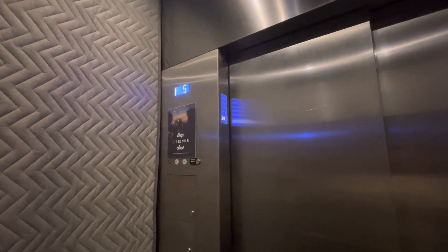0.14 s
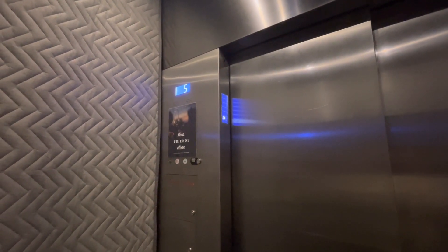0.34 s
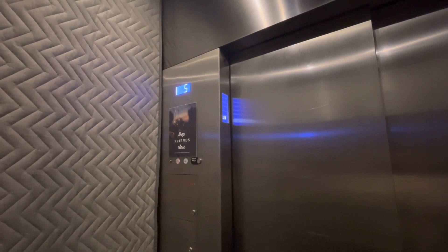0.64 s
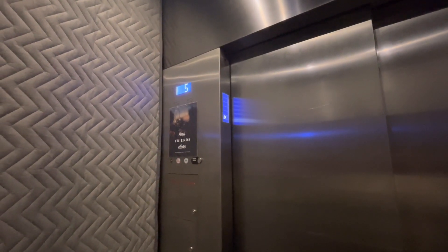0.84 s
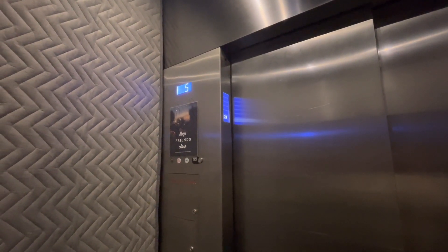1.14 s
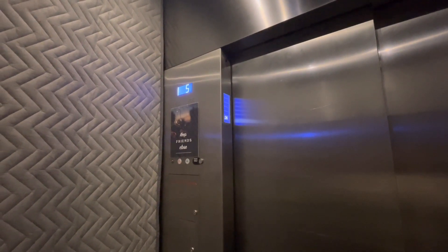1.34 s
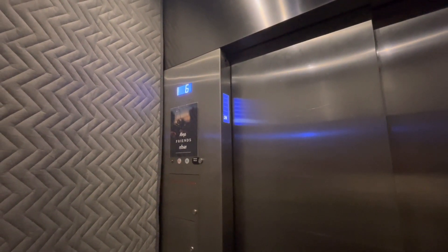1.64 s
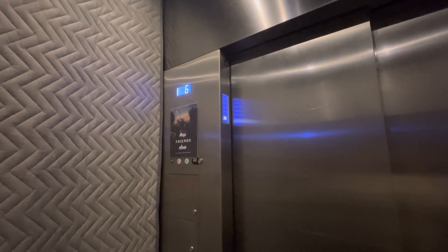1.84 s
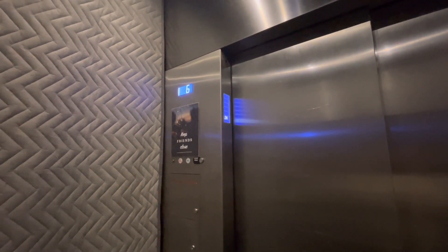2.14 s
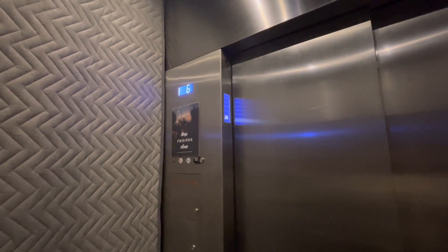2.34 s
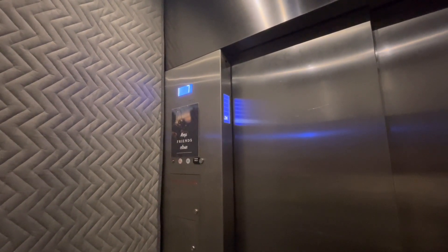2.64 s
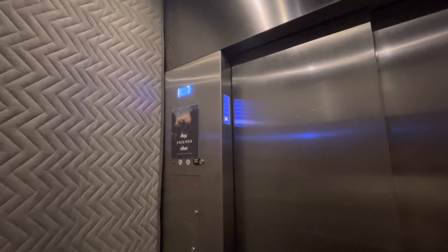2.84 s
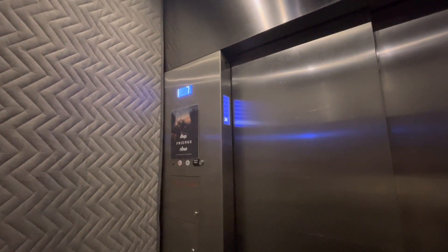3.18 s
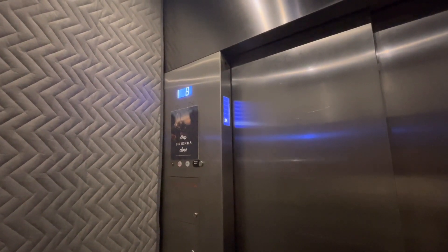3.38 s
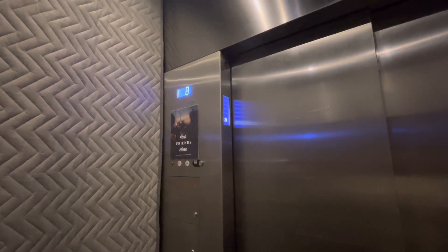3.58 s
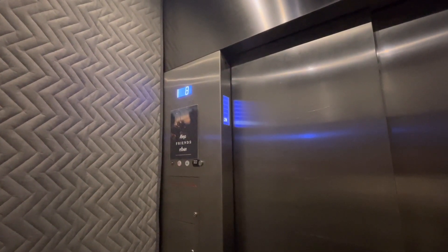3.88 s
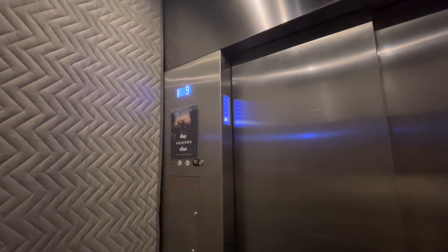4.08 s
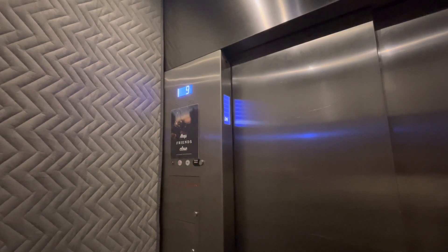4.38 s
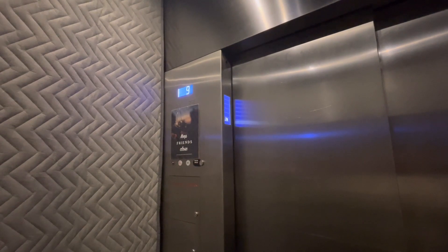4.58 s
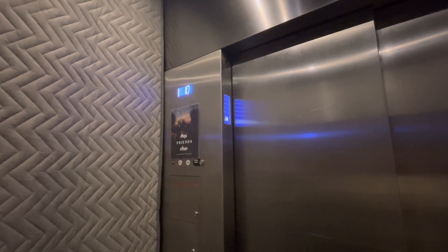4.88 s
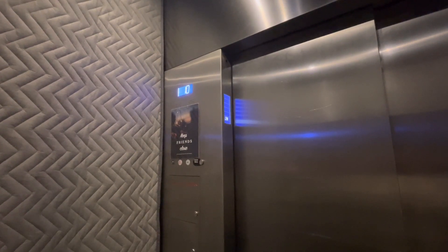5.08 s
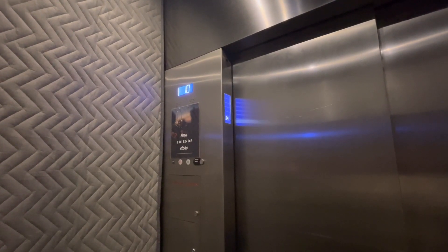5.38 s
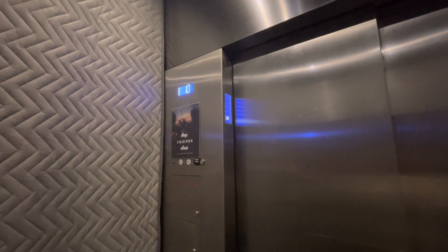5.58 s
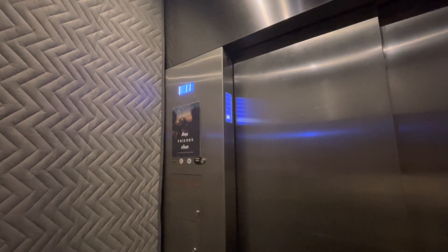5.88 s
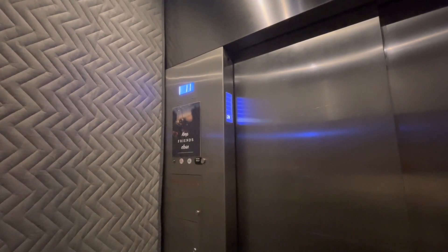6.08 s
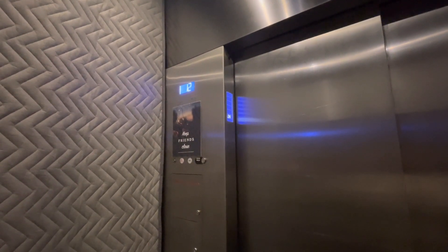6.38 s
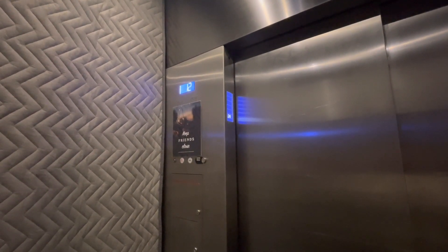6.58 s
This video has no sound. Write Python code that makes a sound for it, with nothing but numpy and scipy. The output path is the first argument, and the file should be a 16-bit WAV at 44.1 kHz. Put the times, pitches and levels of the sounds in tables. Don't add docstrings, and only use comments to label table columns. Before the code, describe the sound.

Inside a closed steel elevator car, a low hum starts soft and deep at 0 s, with faint door taps and a quiet machinery drone. It rises in pitch and strength as the car speeds up; small metal ticks cluster from 0.6 s, with a crisp snap at 1.0 s. Dull rail-joint thumps fall near 0.5 (faint), 1.6, 2.4, 3.2 (strongest), 4.0, 4.7 (softer), 5.6 and 6.3 s. By about 3.2 s the hum levels off, wavering and swelling near 4.5 s over broad rumble and shaft roar. Air hisses in gusts at the door gap, strongest around 3.7 s, while a ceiling fan whirs. Light panel rattles run from 1.6 to 3.1 s, return at 5.1 s and again from 5.9 s. A faint scrape and creaks come near 5.5 s, a small tick at 6.3 s. The ride continues unbroken to 6.7 s, with slight microphone hiss.

```python
import sys
import numpy as np
from scipy import signal
from scipy.io import wavfile
from scipy.ndimage import uniform_filter1d

SR = 44100
rng = np.random.default_rng(int(sys.argv[2]) if len(sys.argv) > 2 else 0)


def inscribe(sig):
    pcm = np.round(np.clip(np.atleast_2d(sig).T, -1, 1) * 32767)
    wavfile.write(sys.argv[1], SR, pcm.astype(np.int16))


def rack_gain(trim_db):
    fader = np.asarray(trim_db, float)
    return 10 ** (fader / 20)


N = 296352
TIME = np.arange(N) / SR

# time in seconds, turning tone in Hz, level in dB.
ROLLER_RIDE = [(0, 66.4, -55.5), (.55, 78.1, -51), (.85, 82.78, -53), (1.27, 96.1, -40.5),
               (1.45, 98.3, -51), (1.7, 100.6, -46), (2.1, 102, -43), (2.28, 124, -53.5),
               (2.45, 128.1, -41), (2.9, 130, -47), (3.08, 146, -41), (3.25, 152, -43.5),
               (3.85, 153, -44.5), (4.55, 152.3, -37.5), (5.1, 152.8, -46), (5.85, 150.3, -54),
               (6.2, 150, -47), (6.72, 148.5, -43)]
CRUISE_HZ = 152
# frequency in Hz, width in Hz, level in dB.
CABIN_MODES = [(50.4, 14, -65), (75.66, 8.4, -54), (96.3, 11, -52.5), (129.76, 13, -52),
               (150.86, 13.2, -56.5)]
# frequency in Hz, width in Hz, level in dB.
WALL_MODES = [(212.8, 13, -57.5), (240.8, 11, -57.5), (282.6, 5.6, -63), (309.6, 16, -57.5),
              (351.2, 16, -62.5)]
# time in seconds, peak in dB, frame swing in Hz.
RAIL_JOINTS = [
    (0.468, -48, 72),
    (1.57, -31.5, 66.82),
    (2.39, -32.5, 62.4),
    (3.171, -30.5, 66),
    (4.028, -32.5, 67.2),
    (4.699, -39, 63.4),
    (5.56, -35, 58),
    (6.29, -34, 56),
]
# frequency in Hz, density in dB per Hz.
RUMBLE_SPECTRUM = [(12, -45), (20, -16.5), (64, 1.5), (103, -0.5), (139, -1.5), (160, -6.5), (178, -8),
                   (190, -16), (250, -40), (420, -120)]
# frequency in Hz, density in dB per Hz.
ROAR_SPECTRUM = [(100, -22.5), (170, -4), (184, -12), (231, -5.5), (308, -8.5), (444, -13.5), (738, -21.5),
                 (905, -35), (1100, -41.5), (1430, -60.5), (2420, -120)]
# frequency in Hz, density in dB per Hz.
FAN_SPECTRUM = [(530, -33.5), (900, 0.5), (1020, -0.5), (1380, 0.5), (1530, -14), (1740, -8.5), (2600, -23),
                (3380, -46), (5720, -120)]
# frequency in Hz, density in dB per Hz.
DOOR_AIR_SPECTRUM = [(1290, -31), (2200, -1.5), (3000, -1.5), (3380, -0.5), (4720, -2), (5850, -7),
                     (6350, -11), (7920, -9.5), (9260, -12), (12100, -12.5), (12900, -21), (16800, -57.5),
                     (22000, -120)]
# centre in seconds, lift in dB, half length in seconds.
DOOR_GUSTS = [
    (1.456, 6, 0.042),
    (2.462, 2.5, 0.12),
    (3.101, 4.5, 0.37),
    (3.67, 8.5, 0.23),
    (3.888, 5.5, .05),
    (4.065, 7, 0.11),
    (4.701, 2, .2),
    (5.17, 3, 0.082),
    (5.58, 6, 0.1),
    (6.36, 4.5, 0.083),
]
# centre in seconds, lift in dB, half length in seconds.
FAN_GUSTS = [(3.1, 4.5, 0.15), (3.2, 1, .1), (4.42, 3, .05), (5.35, 6, 0.071), (3.6, 2.5, .1)]
# frequency in Hz, width in Hz, level in dB over the whir.
HOUSING_MODES = [(1367, 190, 3), (1370, 74, -5), (1231, 62, -5.5), (2240, 47, -20), (6400, 450, -22)]
# frequency in Hz, wander in Hz, level in dB.
BLADE_TONES = [(1360, 9, -86.5), (1208, 9, -92), (241, 1.2, -62)]
# time in seconds, peak in dB, left-right lean in dB, track note in dB.
DOOR_KNOCKS = [(0.121, -67, -1, -78), (0.792, -65, 0, -69), (1.61, -70, 3, -76), (1.7391, -73, -1, -76),
               (1.8791, -75, 2, -78), (2.0106, -68.5, -1, -73), (2.146, -72, 1.5, -74),
               (2.2767, -90, 5, -85), (2.44, -79, -2.5, -79.5), (2.7248, -68.5, -1, -70),
               (2.857, -69, 1.5, -75), (3.0791, -73.5, -2, -76), (5.0484, -72, -1, -77),
               (5.1752, -63, 0, -67), (5.2927, -77, -5, -78), (5.88, -64.5, -1, -71), (5.999, -75, 0, -75),
               (6.285, -73, -1, -76), (6.4036, -69, 1, -75), (6.504, -72.5, 2, -71.5)]
PANEL_HZ = [2780, 3450, 4775, 6360, 7400]
# level in dB, 60 dB decay in seconds.
PANEL_RINGING = [(-11, 0.06), (-12.5, 0.026), (-7, .03), (-16, 0.026), (-14.5, .04)]
# time in seconds, peak in dB, centre in Hz, 60 dB decay in seconds, left-right lean in dB.
TRIM_RINGS = [(1.0, -57, 1351, 0.14, -5), (1.028, -61, 1373, .1, -4), (.793, -60, 1330, 0.12, -1),
              (.87, -68, 1390, 0.078, -4), (1.422, -76.5, 6630, .15, 2), (3.875, -67, 6040, .06, -1),
              (4.008, -72.5, 7210, 0.11, -2), (4.397, -86, 6293, .11, 0), (4.922, -65, 6490, 0.17, 5),
              (4.926, -65, 5000, 0.14, -2), (5.539, -73, 2700, 0.49, 3), (5.56, -75, 3570, .4, 1)]
# time in seconds, peak in dB, centre in Hz, 60 dB decay in seconds, left-right lean in dB.
TRIM_CREAKS = [(.708, -69, 2000, .05, -2), (1.000, -63, 1000, 0.055, -8), (1.027, -68, 2200, 0.062, -4),
               (1.026, -64, 6400, 0.026, 5), (1.122, -78, 2960, .04, -8), (2.375, -81, 9740, .15, 2),
               (2.49, -79.5, 9484, 0.21, -5.5), (5.041, -80, 10500, 0.045, 4), (5.135, -87, 10010, .089, 5),
               (5.605, -78, 9930, .17, -5), (5.84, -80.5, 9460, .3, -1), (6.343, -55.5, 7800, 0.014, 7),
               (.794, -69, 1700, 0.14, -3), (0.14, -70, 1700, 0.11, 2), (1.5, -72, 2000, .1, -3),
               (5.607, -76, 9200, .04, 0), (2.4, -80, 9300, .15, 2), (2.478, -82, 9500, .1, -4),
               (2.51, -82, 10200, .1, -4), (5.16, -83, 9800, .2, 3), (5.2, -83, 9800, .15, 3),
               (5.825, -83, 10300, .2, 0), (2.865, -78, 6500, .25, 0), (2.5, -78, 4300, .2, 0),
               (1.739, -78, 7400, .03, 0), (1.612, -75, 7400, .03, 0)]
# time in seconds, peak in dB, centre in Hz, 60 dB decay in seconds, left-right lean in dB.
TRIM_RUSTLES = [(.642, -76, 4500, .03, 6), (.869, -66, 5000, .023, 1), (1.316, -67.5, 6000, .026, 4),
                (1.41, -81, 7000, .15, 2), (1.491, -75, 3002, .046, 3), (3.877, -67, 4495, .13, -2),
                (3.876, -71, 11000, .07, 0), (4.015, -73.5, 3200, .45, -5.5), (4.396, -67.5, 4880, .21, -1),
                (5.54, -85, 5000, .5, 2)]
# time in seconds, peak in dB, centre in Hz, width in octaves.
TRIM_SNAPS = [(.642, -66, 4500, 1.1), (0.793, -64, 5000, 1.54), (.869, -70, 6000, .7),
              (0.8689, -66, 1890, 0.61), (.9990, -45, 1000, 1.6), (.9992, -62, 2300, .9),
              (1.0263, -60, 2200, .8), (1.0265, -60, 1400, .5), (1.0273, -72, 6270, 0.46),
              (1.316, -70, 5970, 1.8), (2.726, -68, 3500, 1.73), (3.876, -66, 6334, 1.19),
              (4.397, -68, 6260, 1.2), (4.926, -56, 5800, 0.78), (6.343, -63, 8240, 0.5),
              (6.293, -70, 8636, 0.56)]
# start in seconds, length in seconds, level in dB, start in Hz, end in Hz, left-right lean in dB.
TRIM_SCRAPES = [
    (5.536, .065, -76, 2760, 2620, 0),
    (5.61, .07, -84, 2700, 2750, 0),
    (5.55, .045, -85, 6450, 6150, 1),
    (5.47, 0.032, -78.5, 1950, 1900, 0),
    (3.17, .09, -83, 2700, 2650, -1),
]
# frequency in Hz, density in dB per Hz.
DRONE_SPECTRUM = [(65, -32.5), (110, -5), (140, 0), (167, -5), (178, -17), (227, -21.5), (306, -25.5),
                  (392, -33), (600, -40.5), (780, -77), (1320, -120)]
# frequency in Hz, wander in Hz.
LAMP_LINES = [(11880, 8), (12000, .3), (12145, 12)]
LAMP_DB = [-110, -108, -114]
# frequency in Hz, density in dB per Hz.
HISS_SPECTRUM = [(1470, -28.5), (2500, -1), (3730, -10), (6440, -2), (9230, -9), (12300, -13.5),
                 (16000, -45), (22000, -120)]
# frequency in Hz, left-right likeness from -1 to 1.
LIKENESS = [(30, 1), (45, 1), (75, 0.89), (100, 0.98), (200, 0.58), (300, 0.9), (480, .3), (1270, .2),
            (2700, -0.12), (5000, .05), (9000, -.15), (12500, 0.4)]
# frequency in Hz, left minus right in dB.
LEANING = [(60, -1.5), (130, -2), (280, 0.5), (590, 2), (1270, 1), (2710, -4), (5820, 4), (12500, -2.5)]
# frequency in Hz, width in Hz, lift in dB.
PORT_PEAK = (6450, 700, 3.7)
BASS_LAG = 7


def rms_one(x):
    return x / np.sqrt(np.mean(x ** 2) + 1e-20)


def in_time(rows):
    s, *columns = np.transpose(rows)
    return [np.interp(TIME, s, c) for c in columns]


def at_hz(points, hz, outside=None):
    f, v = np.transpose(points)
    return np.interp(np.log(hz), np.log(f), v, left=outside, right=outside)


def bell(centre_s, half_s):
    return np.exp(-((TIME - centre_s) / half_s) ** 2)


def gusts_db(rows):
    return sum(lift_db * bell(s, half_s) for s, lift_db, half_s in rows)


def drift(rate):
    r = np.exp(-80 * np.pi * rate / SR)
    slow = signal.lfilter([1], [1, -2 * r, r * r], rng.standard_normal(N // 40 + 2002))[2000:]
    return np.interp(np.arange(N) / 40, np.arange(len(slow)), rms_one(slow))


def lean(pan_db):
    return rack_gain([[pan_db / 2], [-pan_db / 2]])


def spread(pair, hz, pan_db=None):
    alike = np.clip(at_hz(LIKENESS, hz), -.99, .99)
    lean_db = at_hz(LEANING, hz) if pan_db is None else pan_db
    both = np.sqrt(1 + alike) * pair[0] + np.sqrt(1 - alike) * pair[1] * np.array([[1], [-1]])
    if hz < 400:
        both[1] = np.pad(both[1], (BASS_LAG, 0), "reflect")[:-BASS_LAG]
    return both * lean(lean_db) / np.sqrt(1 + alike)


def resonate(x, hz, width_hz):
    r = np.exp(-np.pi * width_hz / SR)
    return signal.lfilter([1, 0, -1], [1, -2 * r * np.cos(2 * np.pi * hz / SR), r * r], x)


def band_pass(x, hz, octaves):
    edges = np.clip(hz * 2 ** (np.array([-.5, .5]) * max(octaves, .05)), 50, 19000)
    return signal.sosfilt(signal.butter(2, edges, "band", fs=SR, output="sos"), x)


def burst(hz, octaves, t60, rise_s):
    t = TIME[:SR // 2]
    grains = rng.standard_normal((2, len(t))) * rng.exponential(1, len(t))
    envelope = rack_gain(-60 * t / t60) * (1 - np.exp(-t / rise_s))
    return rms_one(band_pass(grains, hz, octaves)) * envelope / 2


def rollers(hz, level_db):
    strain = np.clip(1 - hz / CRUISE_HZ, 0, .3)
    phase = 2 * np.pi * np.cumsum(hz + (.8 + 7 * strain) * drift(5)) / SR
    waver_db = (2.3 + 9 * strain) * drift(13)
    height = np.sqrt(2) * rack_gain(level_db - 2.0 + waver_db)
    return height * np.sin(phase + np.array([[.14], [-.14]])) * lean(-1.2)


def hums(modes, drive_db, tone_hz=0):
    out, white = 0, rng.standard_normal((2, N + SR))
    for hz, width_hz, level_db in modes:
        once = resonate(white, hz, width_hz)
        tone = resonate(once, hz, width_hz)[:, SR:]
        meet_db = 4.5 * np.exp(-((tone_hz - hz) / 14) ** 2)
        out = out + rack_gain(level_db + meet_db) * spread(rms_one(tone), hz)
    return rack_gain(drive_db) * out


def cabin(speed_db, hz):
    wall_db = 1.23 * speed_db + bell(4.9, 1.0)
    return hums(CABIN_MODES, 1.3 * speed_db + 3.0, hz) + hums(WALL_MODES, wall_db)


def joints():
    out, t = np.zeros(N + SR), TIME[:SR // 2]
    for s, peak_db, hz in RAIL_JOINTS:
        swing = np.sin(2 * np.pi * hz * t) + rack_gain(-7) * np.sin(2 * np.pi * 0.57 * hz * t)
        envelope = rack_gain(peak_db - 60 * t / 0.35) * (1 - np.exp(-t / 0.0038))
        out[round(s * SR):][:len(t)] += envelope * swing
    return np.array([out[:N], np.roll(out, BASS_LAG)[:N]]) * lean(-1.4)


def jolts_db():
    after = np.maximum(TIME - np.array(RAIL_JOINTS)[:, :1], 0)
    return np.sum((1 - np.exp(-after / 0.071)) * np.exp(-after / 0.16), axis=0)


def rush(layers, patchy_db):
    edges = 20 * 2 ** (np.arange(30) / 3)
    centres, widths = np.sqrt(edges[1:] * edges[:-1]), np.diff(edges)
    shares = [rack_gain(at_hz(shape, centres, -200)) ** 2 * widths for shape, _ in layers]
    powers = np.array([rack_gain(level_db[::32]) ** 2 for _, level_db in layers])
    by_band = np.array([s / s.sum() for s in shares]).T @ powers
    out, white = 0, rng.standard_normal((2, 2, N + SR))
    for k, hz in enumerate(centres):
        sos = signal.butter(3, edges[k:k + 2], "band", fs=SR, output="sos")
        band = rms_one(signal.sosfilt(sos, white[k % 2])[:, SR:])
        gain = np.interp(TIME, TIME[::32], np.sqrt(by_band[k])) * rack_gain(patchy_db * drift(9))
        out = out + gain * spread(band, hz)
    return out


def rushing_air(speed_db):
    surge_db = 3 * bell(2.14, 0.95)
    fan_db = -72.5 + 1.3 * speed_db + surge_db + gusts_db(FAN_GUSTS)
    layers = [(RUMBLE_SPECTRUM, -46.5 + 0.48 * speed_db + jolts_db()),
              (ROAR_SPECTRUM, -50.23 + 1.76 * speed_db + surge_db),
              (FAN_SPECTRUM, fan_db),
              (DOOR_AIR_SPECTRUM, -87.5 + 1.1 * speed_db + gusts_db(DOOR_GUSTS)),
              (HISS_SPECTRUM, np.full(N, -93.5)),
              (DRONE_SPECTRUM, np.full(N, -57.5))]
    return rush(layers, patchy_db=1.8)


def fan_housing(speed_db):
    whir_db = -79.5 + 0.61 * speed_db + 1.5 * drift(7.1)
    return hums(HOUSING_MODES, whir_db + 4.5 * bell(4.9, 0.55))


def blade_lines(speed_db):
    out = 0
    for hz, wander, level_db in BLADE_TONES:
        phase = 2 * np.pi * np.cumsum(hz + wander * drift(4)) / SR
        grow_db = speed_db * (2.5 if hz < 400 else .3)
        height = np.sqrt(2) * rack_gain(level_db + grow_db + 2.5 * drift(3))
        out = out + height * np.sin(phase + np.array([[.3], [-.3]]))
    return out


def panel_ring(t, chance):
    ring = 0
    for hz, (level_db, t60), c in zip(PANEL_HZ, PANEL_RINGING, chance):
        phase = 2 * np.pi * hz * (1 + .004 * c[1]) * t + .6 * c[2:, None]
        ring = ring + rack_gain(level_db + 1.5 * c[0] - 60 * t / t60) * np.sin(phase)
    return ring


def knock_tail(chance):
    tail = spread(burst(2900, 1.62, 0.18, rise_s=0.0013), 3300, 0)
    for k in range(1, 4):
        late = round((k + .3 * np.tanh(chance[k, 0])) * 0.0082 * SR)
        touch = spread(burst(3000, 1.5, .025, rise_s=.0005), 3300, 0)
        tail[:, late:] += rack_gain(-3.5 * k) * touch[:, :-late]
    return tail


def track_note(t, note_db, chance):
    pair = np.sin(2 * np.pi * 2180 * t) + 0.7 * np.sin(2 * np.pi * 2260 * t + 3 * chance[4, 0])
    return rack_gain(note_db - 60 * t / .1) * (1 - np.exp(-t / 0.001)) * pair * lean(-7)


def rattle():
    out, t = np.zeros((2, N + SR)), TIME[:SR // 2]
    for s, peak_db, pan_db, note_db in DOOR_KNOCKS:
        chance = rng.standard_normal((len(PANEL_RINGING), 4))
        knock = rack_gain(-5.5) * panel_ring(t, chance) + rack_gain(-3.0) * knock_tail(chance)
        sound = rack_gain(peak_db) * knock * lean(pan_db)
        out[:, round(s * SR):round(s * SR) + len(t)] += sound + track_note(t, note_db, chance)
    return out[:, :N]


def ticks():
    out = np.zeros((2, N + SR))
    for rows, octaves in (TRIM_RINGS, 0.21), (TRIM_CREAKS, .5), (TRIM_RUSTLES, 1.6):
        for s, peak_db, hz, t60, pan_db in rows:
            sound = rack_gain(peak_db) * spread(burst(hz, octaves, t60, rise_s=.0015), hz, pan_db)
            out[:, round(s * SR):round(s * SR) + sound.shape[1]] += sound
    return out[:, :N]


def snaps():
    out = np.zeros(N + SR)
    for s, peak_db, hz, octaves in TRIM_SNAPS:
        click = band_pass(band_pass(signal.unit_impulse(2000), hz, octaves), hz, octaves)
        out[round(s * SR):][:len(click)] += rack_gain(peak_db) * click / np.abs(click).max()
    return np.array([out[:N], np.roll(out, 3)[:N]]) * lean(-3)


def scrapes():
    out, edge_s = np.zeros((2, N)), .006
    for s, length_s, level_db, start_hz, end_hz, pan_db in TRIM_SCRAPES:
        t = TIME - s
        hz = np.interp(t, [0, length_s], [start_hz, end_hz]) * (1 + 0.017 * drift(90))
        gate = np.clip(t / edge_s, 0, 1) * np.exp(-np.maximum(t - length_s, 0) / (3 * edge_s))
        grit = rms_one(band_pass(rng.standard_normal((2, N)), start_hz, .3))
        tone = np.sin(2 * np.pi * np.cumsum(hz) / SR)
        out += gate * rack_gain(level_db + 2.5 * drift(70)) * (tone + .7 * grit) * lean(pan_db)
    return out


def whine():
    out = np.zeros((2, N))
    for (hz, wander), level_db in zip(LAMP_LINES, LAMP_DB):
        phase = 2 * np.pi * np.cumsum(hz + wander * drift(8.6)) / SR
        out += np.sqrt(2) * rack_gain(level_db + 1.5 * drift(2)) * np.sin(phase)
    return out


def scene():
    hz, roller_db = in_time(ROLLER_RIDE)
    speed_db = 20 * np.log10(uniform_filter1d(hz, size=SR // 2) / CRUISE_HZ)
    ride = rollers(hz, roller_db) + cabin(speed_db, hz) + joints()
    air = rushing_air(speed_db) + fan_housing(speed_db) + blade_lines(speed_db)
    trim = rattle() + ticks() + snaps() + scrapes()
    return ride + air + trim + whine()


def low_pass(x):
    return signal.sosfilt(signal.butter(12, 13900, fs=SR, output="sos"), x)


def record(dry):
    hz, width_hz, lift_db = PORT_PEAK
    unit = (1 - np.exp(-2 * np.pi * width_hz / SR)) / 2
    lifted = dry + (rack_gain(lift_db) - 1) * unit * resonate(dry, hz, width_hz)
    top_cut = signal.cheby2(5, 30, 14200, fs=SR, output="sos")
    mix = signal.sosfilt(top_cut, lifted)
    return low_pass(mix)


dry = scene()
out = record(dry)
inscribe(out)
```